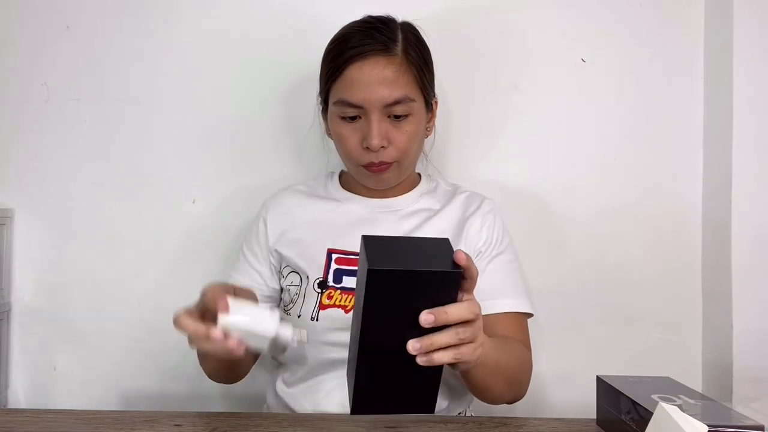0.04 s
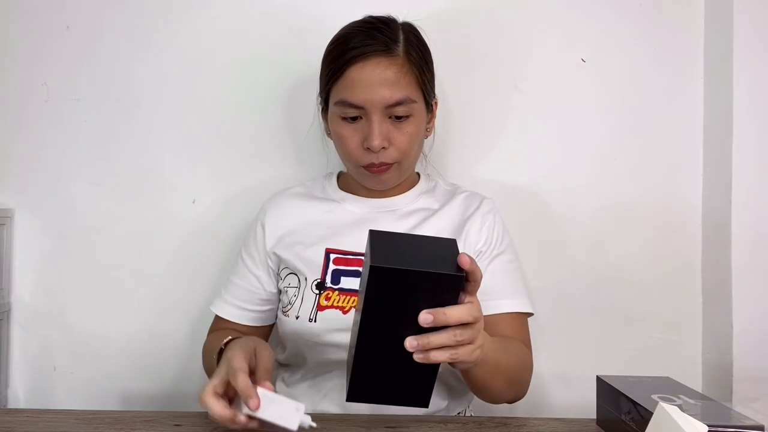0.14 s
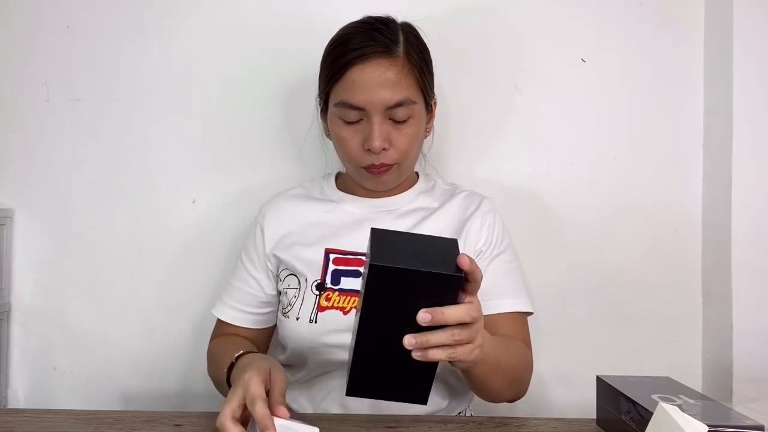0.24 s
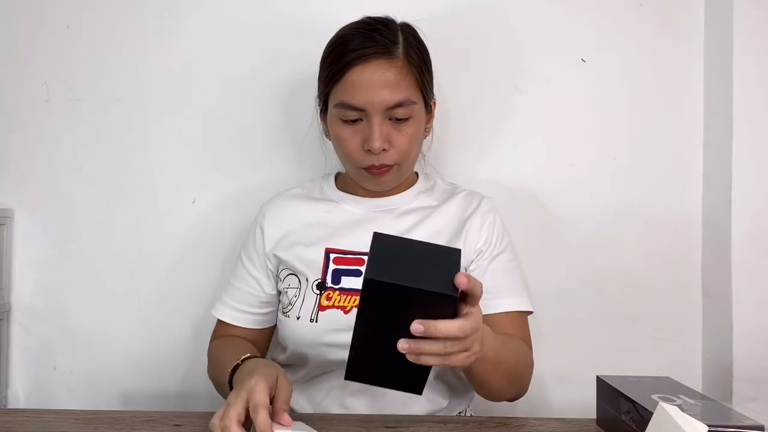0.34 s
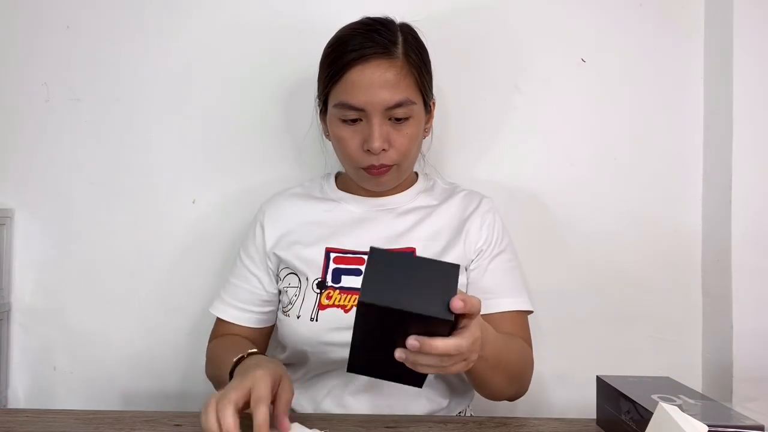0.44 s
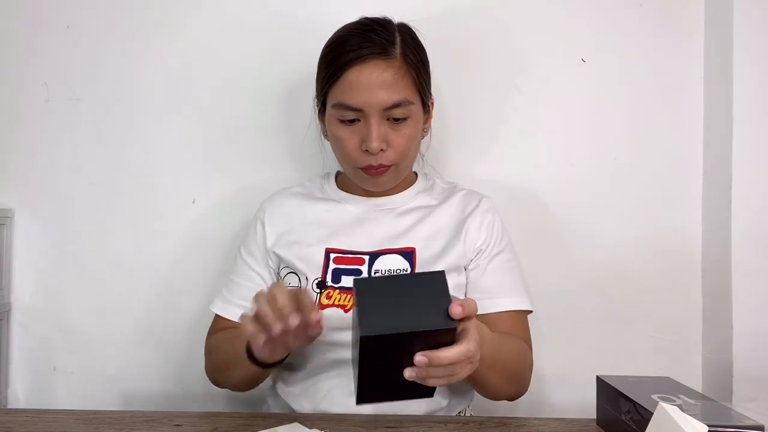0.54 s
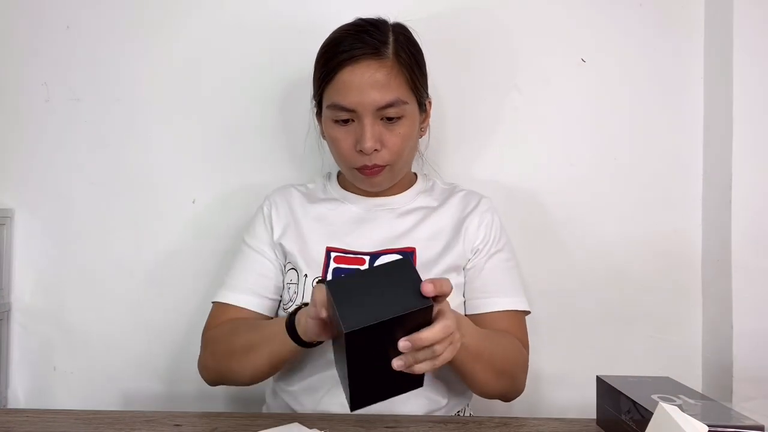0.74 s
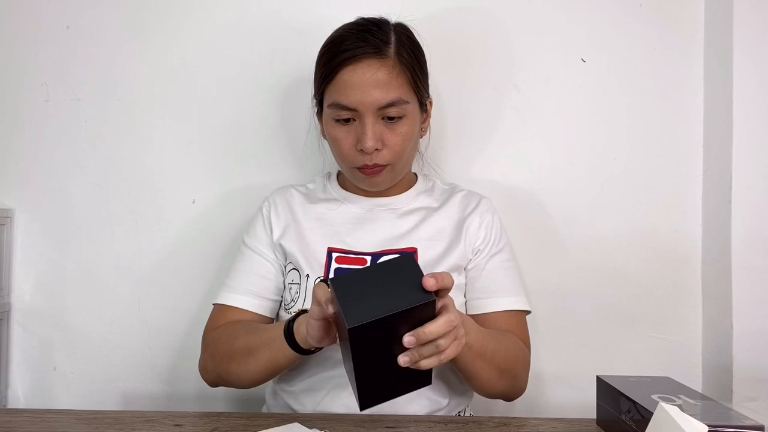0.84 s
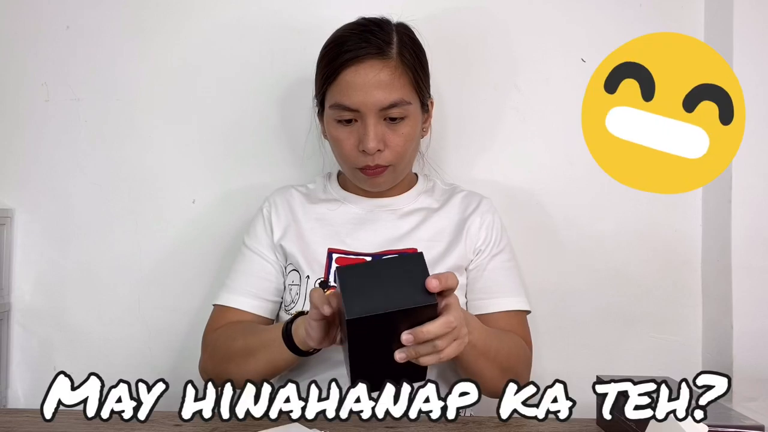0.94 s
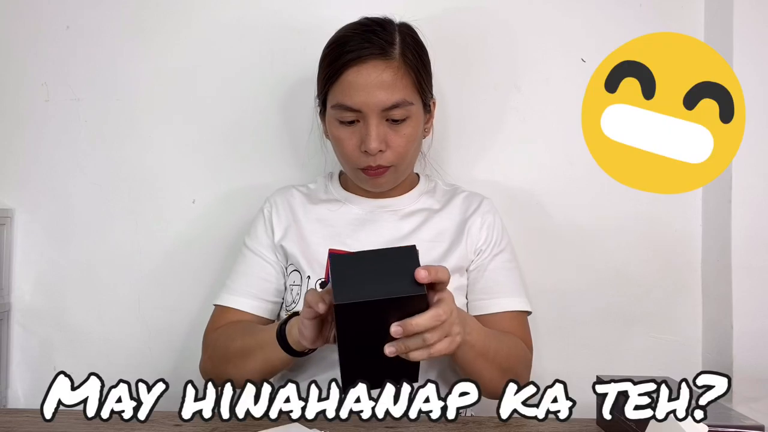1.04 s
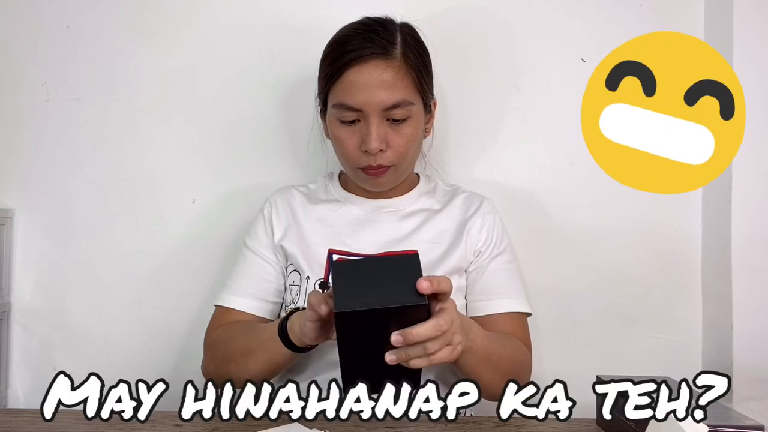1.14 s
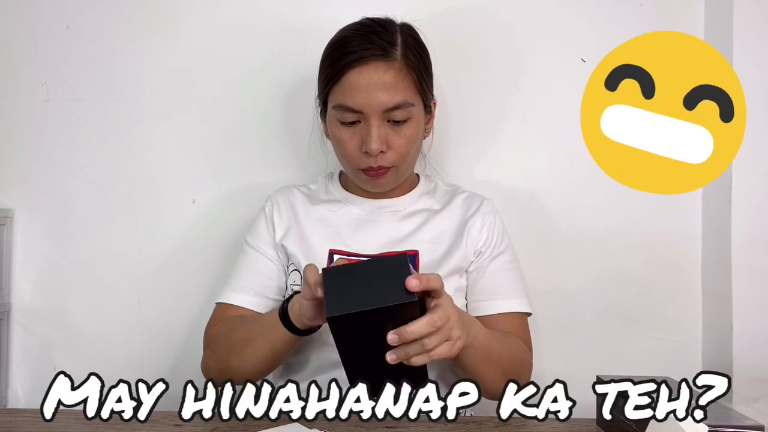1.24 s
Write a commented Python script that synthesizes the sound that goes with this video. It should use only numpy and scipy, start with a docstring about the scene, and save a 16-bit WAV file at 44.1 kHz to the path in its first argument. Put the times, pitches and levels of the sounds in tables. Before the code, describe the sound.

Close stereo pickup in a hard-walled room: dull hum, a small clatter and scrape, one strong table knock with reverberation, a quiet tap on a cardboard box, then suddenly only faint lid rubbing and fingernail ticks.

```python
"""A small cardboard box is handled at a wooden table in a bare, ringing room.
First there is dull room noise with a low, wavering hum: filtered noise and a drifting sine.
A light part is put down, rocks and slides; a sharp knock sets the table booming and swaying (dying sines).
A hand taps the box and shifts its grip. Then all of this stops abruptly, and fingers rub the snug lid
(noise full of tiny slips) and tick at its edge (short clicks that ring)."""
import sys
import numpy as np
from scipy import signal
from scipy.io import wavfile
from scipy.ndimage import uniform_filter1d

SR = 44100
rng = np.random.default_rng(int(sys.argv[2]) if len(sys.argv) > 2 else 0)


def to_wav(s):
    """Save 16-bit WAV."""
    ch = np.atleast_2d(s).T  # columns
    pcm = np.round(np.clip(ch, -1, 1) * 32767)  # PCM
    wavfile.write(sys.argv[1], SR, pcm.astype(np.int16))


N = 57330
T = np.arange(N) / SR  # time of every sample in seconds


def from_db(db):
    """Turn decibels into a plain gain."""
    return 10 ** (np.asarray(db) / 20)


def rms_one(x):
    """Scale a signal so that its average power is one."""
    return x / np.sqrt(np.mean(x ** 2) + 1e-20)


def level(rows, axis=1):
    """Gain over time: straight lines between the dB points of one column."""
    rows = np.array(rows)
    return from_db(np.interp(T, rows[:, 0], rows[:, axis]))


def at_hz(points, hz):
    """Read a table at a frequency, with straight lines between points on a log-frequency axis."""
    points = np.array(points)
    return np.interp(np.log(hz), np.log(points[:, 0]), points[:, 1])


def bands(spectrum):
    """Third-octave bands (centre in Hz, filter, gain) that give white noise this colour at unit power."""
    edges = 28 * 2 ** (np.arange(29) / 3)
    centres = np.sqrt(edges[1:] * edges[:-1])
    gains = from_db(at_hz(spectrum, centres))
    power = np.sum(gains ** 2 * np.diff(edges)) * 2 / SR
    filters = [signal.butter(2, pair, "band", fs=SR, output="sos") for pair in zip(edges, edges[1:])]
    return zip(centres, filters, gains / np.sqrt(power))


SLIPS_PER_S, SLIP_SPREAD_DB = 2600, -5.5  # the spread multiplies a random number from 0 to 4
GRAIN_DB = -10  # how much the slips add to the steady noise


def add_slips(white):
    """Rubbing surfaces stick and let go: make the noise stronger at random instants."""
    slip_here = rng.random(N) < SLIPS_PER_S / SR
    strength = from_db(SLIP_SPREAD_DB * np.minimum(rng.exponential(1, N), 4))
    return rms_one(white * (1 + from_db(GRAIN_DB) * rms_one(slip_here * strength)))


# How long the room rings. Each row: frequency in Hz, time to fall by 60 dB in seconds.
ROOM_T60 = [(100, 0.28), (300, 0.56), (1000, 0.48), (2500, 0.52), (5000, 0.4), (12000, 0.34)]
# How alike left and right are. Each row: frequency in Hz, correlation (1 = the same in both).
LIKENESS = [(60, 1), (150, 0.72), (280, 0.63), (500, 0.097), (1000, 0.017), (3000, 0.1), (5000, 0.17),
            (8000, 0.9), (13000, 0.091)]


def noise(spectrum, ring_share=None, slips=False):
    """Coloured stereo noise; ring_share makes it die away in that share of the room's ringing time."""
    white = rng.standard_normal((2, 2, N))
    if slips:
        white = add_slips(white)
    out = 0
    for k, (hz, band_filter, gain) in enumerate(bands(spectrum)):
        # bands take turns between two noises, so neighbours are independent
        mid, side = signal.sosfilt(band_filter, white[k % 2])
        alike = np.clip(at_hz(LIKENESS, hz), -1, 1)
        shared = np.sqrt((1 + alike) / 2) * mid
        opposed = np.sqrt((1 - alike) / 2) * side * [[1], [-1]]
        fade = 1
        if ring_share is not None:
            fade = from_db(-60 * T / (ring_share * at_hz(ROOM_T60, hz)))
        out = out + gain * fade * (shared + opposed)
    return out


def clicks(rows, axis=1):
    """One single-sample push per event, as strong as the chosen dB column."""
    out = np.zeros(N)
    for row in rows:
        out[int(row[0] * SR)] += from_db(row[axis])
    return out


def excite(force, response):
    """Let a force set off a response: every push starts a copy of it (convolution)."""
    return signal.fftconvolve(np.atleast_2d(force), np.atleast_2d(response), axes=1)[:, :N]


def ringing(modes):
    """A struck body rings as a sum of dying sines; their signs alternate."""
    out = np.zeros(N)
    for k, (hz, db, t60) in enumerate(modes):
        out += (-1) ** k * from_db(db - 60 * T / t60) * np.sin(2 * np.pi * hz * T)
    return out


def room_tail(spectrum, ring_share=1):
    """Room reflections build up quickly, then die away band by band."""
    build_up_s = 0.0017
    return noise(spectrum, ring_share) * (1 - np.exp(-T / build_up_s))


def lean_left(x, pan_db):
    """Raise the left channel and lower the right one by the same number of dB."""
    return x * from_db([[pan_db], [-pan_db]])


def delay_left(x):
    """Sound from a near source reaches the right microphone a little earlier than the left."""
    lag_s = 0.00034
    return np.array([np.interp(T - lag_s, T, x[0]), x[0]])


# Colour of the dull room noise. Each row: frequency in Hz, relative level in dB per Hz.
RUMBLE = [(30, -25), (70, -7.5), (150, -9), (260, -1), (400, -13), (800, -15), (1500, -28), (4000, -40),
          (12000, -52)]
RUMBLE_DB = -51


def room_rumble():
    """Dull, steady room noise made of filtered random noise."""
    return from_db(RUMBLE_DB) * noise(RUMBLE)


# The low hum swells and fades. Each row: time in seconds, level in dB.
HUM_LEVEL = [(0, -49), (.04, -46.5), (.11, -52), (.17, -56.5), (.65, -61), (.76, -52.5), (.84, -46.5),
             (.9, -52), (.93, -56)]
HUM_HZ, HUM_WAVER_HZ = 148.5, 4.2  # middle pitch and typical drift away from it


def low_hum():
    """A sine whose pitch wavers slowly with smoothed random noise."""
    waver = rms_one(uniform_filter1d(rng.standard_normal(N), size=3000))
    phase = 2 * np.pi * np.cumsum(HUM_HZ + HUM_WAVER_HZ * waver) / SR
    return level(HUM_LEVEL) * np.sqrt(2) * np.sin(phase)


# Blows on the table. Each row: start in seconds, then the strength in dB of the boom of the top,
# of the crack of the contact and of the room tail.
KNOCKS = [(.2045, -9, -16, -17.5), (.2235, -24, -19, -24), (.249, -13, -27, -23), (.268, -15, -30.5, -41),
          (.398, 2, 1, 2), (.4003, -14.5, -8, -28), (.4235, -17.5, -15, -44), (.4435, -5, -14, -47)]
# Tones of the table top. Each row: frequency in Hz, level in dB, time to fall by 60 dB in seconds.
TABLE_MODES = [(41.7, -49.5, 2.1), (59.5, -31.5, 0.27), (83.8, -37.5, 0.3), (143.2, -29.5, 0.34),
               (204.9, -36, 0.76), (261.9, -16.5, 0.29), (315, -23.5, .6), (359.4, -28.5, 0.55),
               (465.8, -29, 0.229), (620, -23, .2), (695, -26.5, 0.095), (782.4, -36.5, 0.37)]
# Tones of the hard contact. Each row: frequency in Hz, level in dB, time to fall by 60 dB in seconds.
CRACK_MODES = [(624, -7, 0.016), (1560, -16.5, 0.012), (1849, -12.5, 0.031), (2543, -17.5, 0.036),
               (2970, -11, 0.02), (3477, -12, 0.011), (4155, -21, 0.034), (4980, -23, 0.02),
               (7690, -30, 0.0039), (11000, -54, 0.0044)]
# Colour of the room's answer to a blow. Each row: frequency in Hz, relative level in dB per Hz.
KNOCK_TAIL = [(60, 0), (130, -20), (280, 7.5), (450, -12.5), (750, -4), (1150, -8.5), (1750, -5.5),
              (2900, -9.5), (4200, -19), (6500, -28.5), (10000, -40.5), (14000, -58)]
KNOCK_TAIL_DB, TABLE_PAN_DB, CRACK_PAN_DB = -17, 1, 1.1


def table_knocks():
    """Each blow cracks at the contact, booms in the table top and rings on in the room."""
    boom = lean_left(delay_left(excite(clicks(KNOCKS, axis=1), ringing(TABLE_MODES))), TABLE_PAN_DB)
    crack = lean_left(excite(clicks(KNOCKS, axis=2), ringing(CRACK_MODES)), CRACK_PAN_DB)
    tail = excite(clicks(KNOCKS, axis=3), room_tail(KNOCK_TAIL))
    return boom + crack + from_db(KNOCK_TAIL_DB) * tail


# Loudness of the sliding part. Each row: time in seconds, level in dB.
SLIDE_LEVEL = [(.2, -66), (.23, -27), (.3, -35), (.36, -36.5), (.4, -30), (.46, -75)]
# Colour of the sliding. Each row: frequency in Hz, relative level in dB per Hz.
SLIDE = [(100, -7.5), (220, 3.5), (330, 0), (480, -2.5), (700, -19.5), (1200, -36), (2800, -15.5),
         (6000, -35.5), (12000, -53.5)]


def part_slide():
    """The part slides on the table in tiny slips, from the first blow on."""
    after_first_blow = T > KNOCKS[0][0]
    return level(SLIDE_LEVEL) * noise(SLIDE, slips=True) * after_first_blow


TABLE_TREBLE_CUT_HZ = 12900


def cut_table_treble(x):
    """Steeply cut the highest treble from the table sounds."""
    return signal.sosfilt(signal.butter(12, TABLE_TREBLE_CUT_HZ, fs=SR, output="sos"), x)


# The hand meets the box. Each row: start in seconds, strength in dB.
TAPS = [(.7205, -11), (.7235, 2.5)]
# Tones of the box. Each row: frequency in Hz, level in dB, time to fall by 60 dB in seconds.
BOX_MODES = [(152.7, -42.5, 0.18), (364, -38.5, 0.11), (610, -32, 0.018), (804, -35, 0.058),
             (1177, -41, 0.2), (1745, -34, 0.052), (2970, -31, 0.0081)]
# Colour of the room's answer to a tap. Each row: frequency in Hz, relative level in dB per Hz.
TAP_TAIL = [(100, 0), (300, -1), (800, -1), (1600, -1), (3000, -11), (5000, -16), (9000, -25.5),
            (14000, -38)]
TAP_TAIL_DB = -37


def box_taps():
    """A hollow double tap: the card box rings briefly and the room answers."""
    tail = from_db(TAP_TAIL_DB) * room_tail(TAP_TAIL)
    return excite(clicks(TAPS), ringing(BOX_MODES) + tail)


# Loudness of the shifting hand. Each row: time in seconds, level in dB.
GRIP_LEVEL = [(.72, -70), (.78, -58), (.85, -54.5), (.9, -46.5), (.93, -51.5)]
# Colour of the shifting hand. Each row: frequency in Hz, relative level in dB per Hz.
GRIP = [(100, 3), (300, -6), (800, 4.5), (1300, -1.5), (2500, -21), (5000, -15.5), (9000, -23),
        (14000, -36)]


def grip_shift():
    """The hand shifts on the box in tiny slips, from the first tap on."""
    after_first_tap = T > TAPS[0][0]
    return level(GRIP_LEVEL) * noise(GRIP, slips=True) * after_first_tap


# Card rubs on card. Each row: time in seconds, groan in dB, hiss in dB (both before the trims below).
RUB_LEVEL = [(0.94, -54.5, -57.5), (0.954, -52.5, -53), (1.078, -50.5, -57.5), (1.084, -52, -53.5),
             (1.116, -47, -59), (1.174, -55.5, -55.5), (1.2, -50, -63), (1.236, -52, -60),
             (1.3, -50, -51.5)]
# Colour of the groan. Each row: frequency in Hz, relative level in dB per Hz.
RUB_GROAN = [(35, -36), (90, -16.5), (200, -14.5), (300, -6), (380, -3.5), (500, 0), (720, -8.5),
             (900, -13), (1600, -40)]
# Colour of the hiss. Each row: frequency in Hz, relative level in dB per Hz.
RUB_HISS = [(100, -42), (600, -15), (1000, -1), (1550, 4), (2000, -2.5), (2600, -1), (4000, -7.5),
            (6000, -15.5), (10000, -21), (15000, -31)]
LID_HZ, LID_T60_S = 292, 0.18  # the lid panel's tone and its time to fall by 60 dB
LID_DB, GROAN_DB, HISS_DB = -3.5, 0, 0.5  # trims


def lid_rub():
    """Tiny slips of the snug lid hiss and groan; steady noise keeps the lid panel sounding."""
    panel = rms_one(excite(rng.standard_normal(N), ringing([(LID_HZ, 0, LID_T60_S)])))
    low_part = from_db(GROAN_DB) * noise(RUB_GROAN, slips=True) + from_db(LID_DB) * panel
    groan = level(RUB_LEVEL, axis=1) * low_part
    hiss = level(RUB_LEVEL, axis=2) * from_db(HISS_DB) * noise(RUB_HISS, slips=True)
    return groan + hiss


# Fingernails catch on the lid. Each row: start in seconds, strength in dB.
TICKS = [(1.142, 0.5), (1.153, -1), (1.282, -10), (1.291, -2)]
# Tones of a tick. Each row: frequency in Hz, level in dB, time to fall by 60 dB in seconds.
NAIL_MODES = [(3250, -49, 0.041), (4400, -57, 0.028), (7400, -52, 0.0045)]
# Colour of the room's answer to a tick. Each row: frequency in Hz, relative level in dB per Hz.
TICK_TAIL = [(300, -5), (1000, 12), (2300, 0), (3350, -9), (5500, -4), (10000, -3.5), (15000, -6)]
TICK_TAIL_DB, TICK_RING_SHARE = -49.5, 0.48  # the share is of the room's ringing time


def nail_ticks():
    """Fingernails tick on the lid's edge: brief high tones and a short room tail."""
    tail = from_db(TICK_TAIL_DB) * room_tail(TICK_TAIL, TICK_RING_SHARE)
    return excite(clicks(TICKS), ringing(NAIL_MODES) + tail)


BACKGROUND_END_S = .928


def scene():
    """The background, table and box sounds stop abruptly as the lid sounds come in."""
    before = np.clip((BACKGROUND_END_S - T) / 0.002, 0, 1)  # gone within 2 ms
    after = np.clip((T - BACKGROUND_END_S + 0.005) / 0.022, 0, 1)  # rises over 22 ms
    background = room_rumble() + low_hum()
    table = cut_table_treble(table_knocks() + part_slide())
    box = box_taps() + grip_shift()
    lid = lid_rub() + nail_ticks()
    return before * (background + table + box) + after * lid


LOW_CUT_HZ, CUTOFF_HZ = 36, 16900


def record(dry):
    """The microphones lose the deepest bass; the top is cut steeply."""
    low_cut = signal.butter(2, LOW_CUT_HZ, "high", fs=SR, output="sos")
    top_cut = signal.cheby2(12, 70, CUTOFF_HZ, fs=SR, output="sos")  # 70 dB down from the cutoff up
    return signal.sosfilt(top_cut, signal.sosfilt(low_cut, dry))


dry = scene()
out = record(dry)
to_wav(out)
```